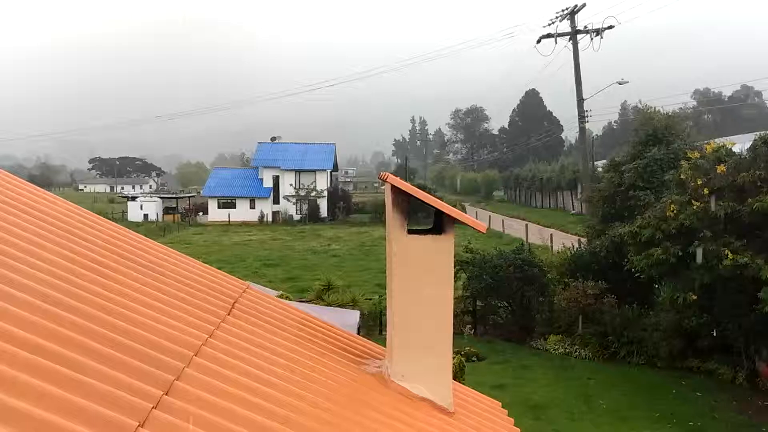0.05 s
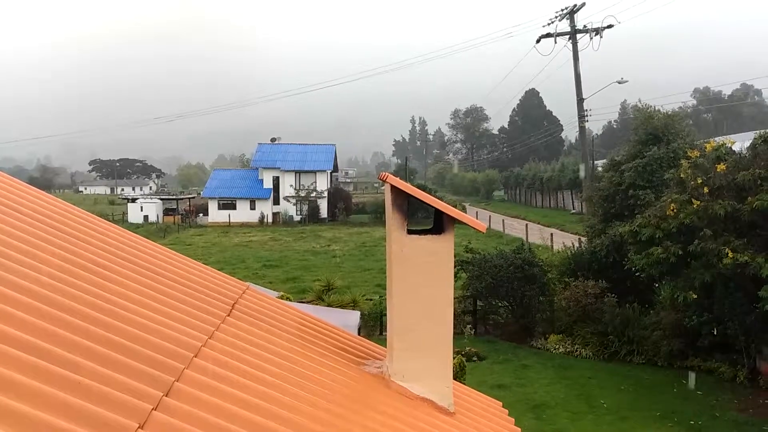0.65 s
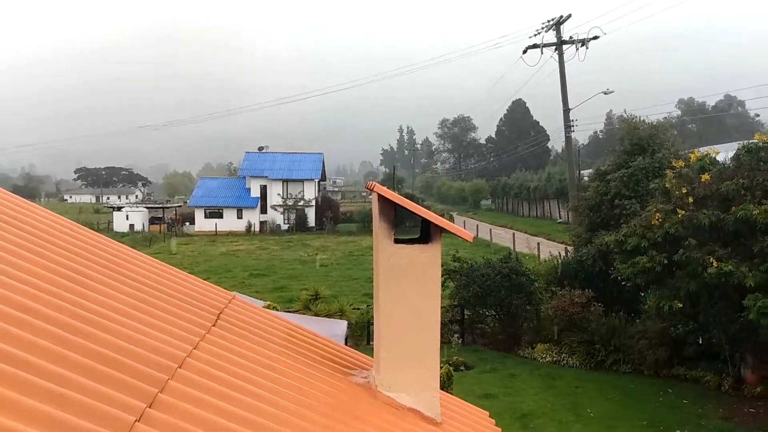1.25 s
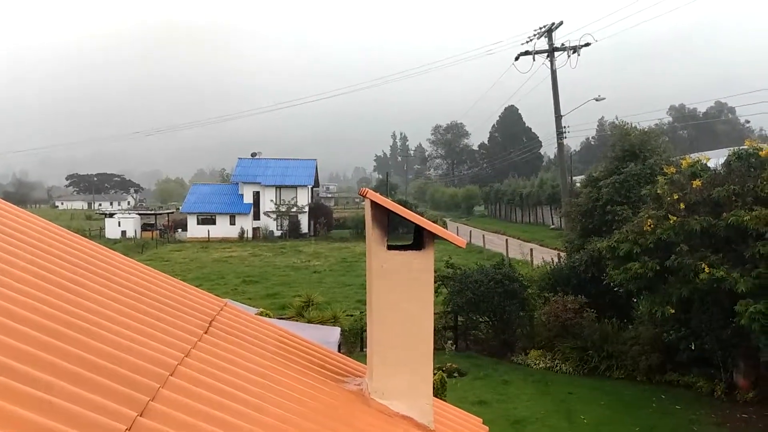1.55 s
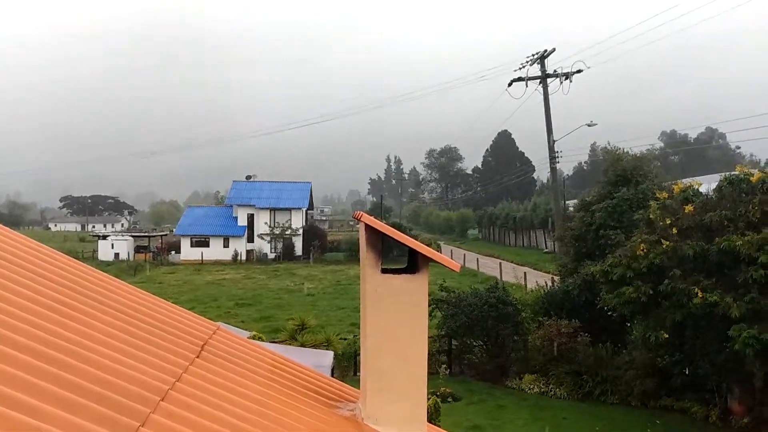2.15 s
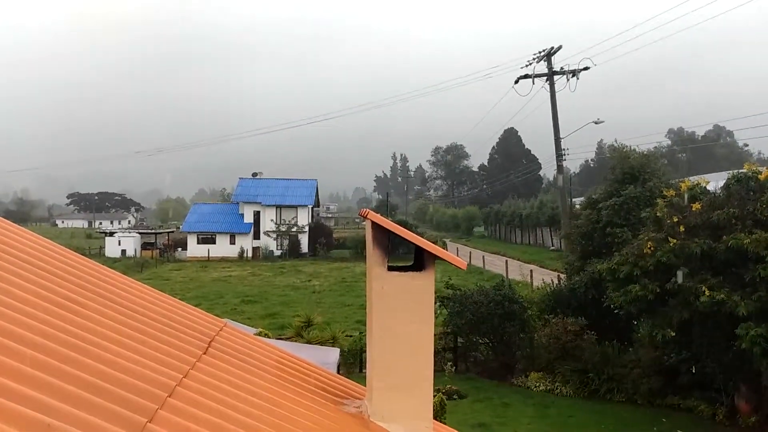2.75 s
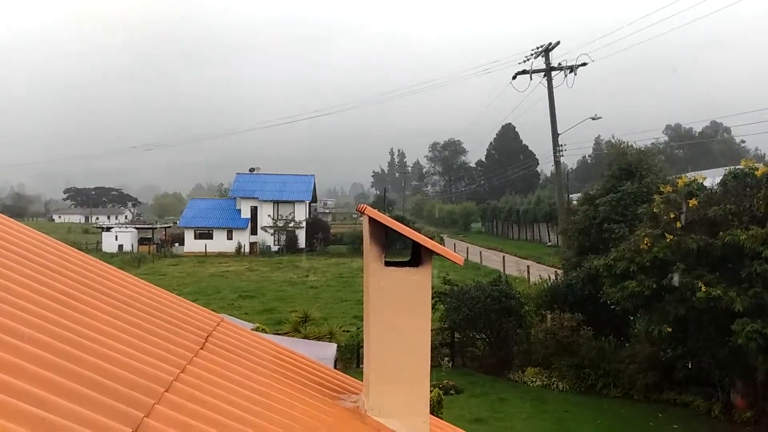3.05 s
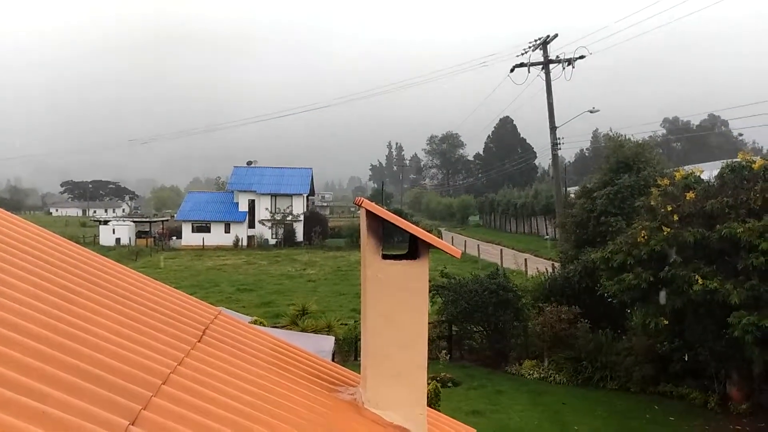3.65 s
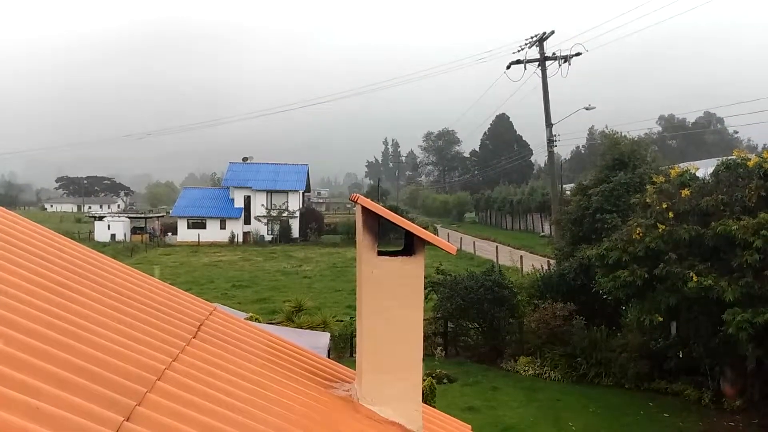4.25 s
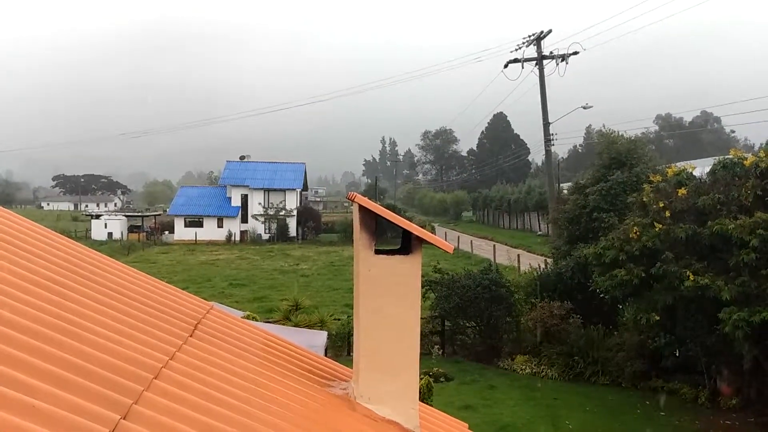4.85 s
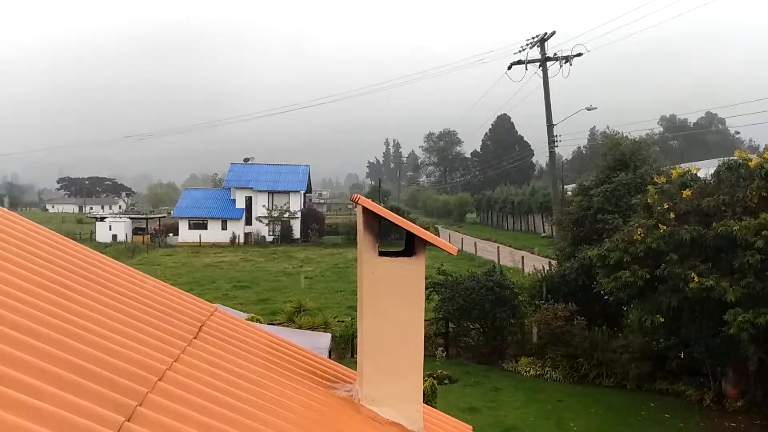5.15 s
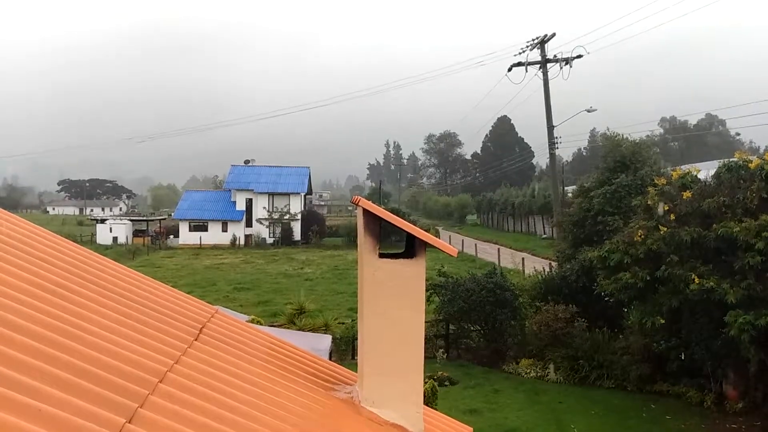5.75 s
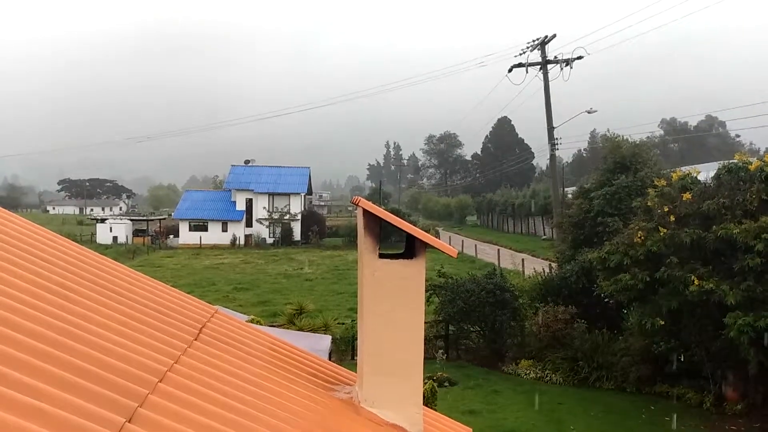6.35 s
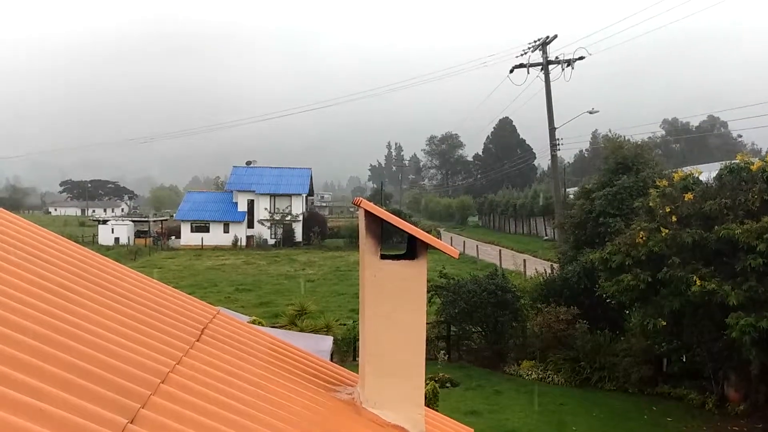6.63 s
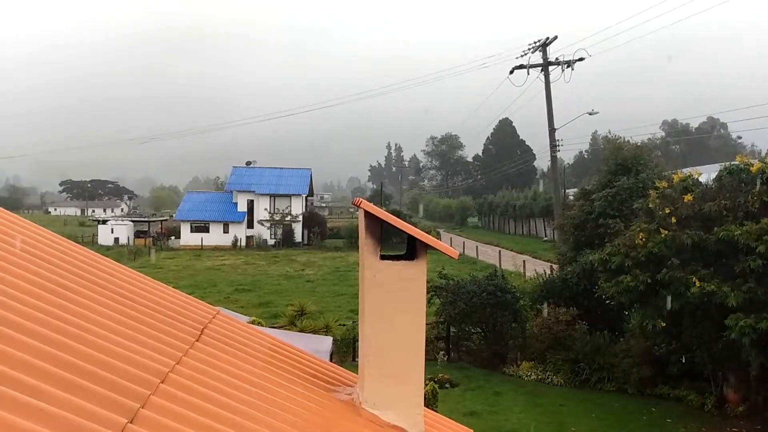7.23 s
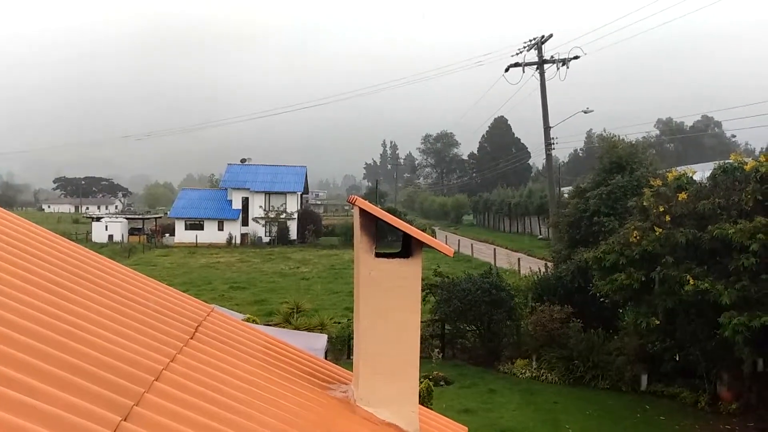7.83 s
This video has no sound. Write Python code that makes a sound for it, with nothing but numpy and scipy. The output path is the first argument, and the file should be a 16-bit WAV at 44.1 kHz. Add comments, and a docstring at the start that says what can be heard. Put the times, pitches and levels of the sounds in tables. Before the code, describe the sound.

Steady rain falls on a roof and the surrounding fields, an even wash with fine drops ticking close to the microphone and a few dull knocks on the roof. An engine drones very faintly far away. A little past halfway, thunder creeps in and the shower thickens. The thunder builds into two loud, booming rolls with deep thumps, the second the loudest, still sounding at the end.

```python
"""Steady rain on a roof and the fields around it, heard through a small pair of microphone ports.
Far drops merge into a wash; close by, fine ones fizz and tick, heavy ones knock on the roof and drips
splash below the eaves. An engine drones faintly in the distance. After four and a half seconds thunder
creeps in and the shower soon thickens. Shock waves from the branches of the lightning pile up into two
loud rolls, coloured by reflections between the roof and walls of the house."""
import sys
import numpy as np
from scipy import signal
from scipy.fft import rfft, irfft
from scipy.io import wavfile
from scipy.ndimage import uniform_filter1d, minimum_filter1d

SR = 44100
rng = np.random.default_rng(int(sys.argv[2]) if len(sys.argv) > 2 else 0)


def master_out(mix):
    """Clip the mix to full scale and print it as 16-bit PCM to the path in sys.argv[1]."""
    frames = np.transpose(np.atleast_2d(mix))
    ceiling = np.clip(frames, -1, 1)
    pcm = np.round(ceiling * 32767).astype(np.int16)
    wavfile.write(sys.argv[1], SR, pcm)


N = 347949
TIME, FREQ = np.arange(N) / SR, np.fft.rfftfreq(N, 1 / SR)

# Tone of the rain on roof and fields. Each row: frequency in Hz, relative level in dB.
RAIN_SPECTRUM = [(25, -27), (60, -14.5), (140, -12.5), (210, -2.5), (290, 1.5), (360, -2), (800, 0.4),
                 (1300, -2), (1900, -3.5), (2800, -13.5), (4300, -26.5), (6200, -34.5), (7800, -42),
                 (15000, -43.5)]
# How alike the rain is at the two ports. Each row: frequency in Hz, coherence from 0 to 1.
RAIN_COHERENCE = [(50, 0.5), (140, 0.3), (200, 0.73), (290, 0.9), (390, 0.51), (650, 0.85), (1100, 0.97),
                  (1320, 0.94), (1500, 0), (1800, 0.7), (2250, 0.96), (2600, 0.44), (2900, 0.14),
                  (3400, 0.5), (4600, 0.73), (5300, .5), (9000, 0.5)]
# Where the rain sits between the ports. Each row: frequency in Hz, left over right in dB.
RAIN_BALANCE = [(100, 5), (180, -2), (340, 3), (400, 1.5), (1150, 0), (1550, 5), (2100, -0.7), (2900, -1.5),
                (3700, 3.5), (6800, 5.5), (8500, 11), (12500, 9), (15500, 13.5)]
# How far the left port leads the right. Each row: frequency in Hz, phase in radians.
LEFT_PORT_LEAD = [(0, 0), (120, -.4), (175, .6), (310, -.4), (420, .15), (560, -.15), (1350, 0),
                  (1600, -2.5), (2200, -3.14), (2600, -3.9), (3150, -6.3), (3550, -6.2), (4500, -3.2),
                  (15200, 24.5)]
# Tone of fine drops close to the microphone. Each row: frequency in Hz, relative level in dB.
SPRAY_SPECTRUM = [(500, -18.5), (2500, 1), (5500, 6.5), (8000, -1.5), (13000, 5), (15500, 3.5)]
# The nearest drops. Each row: start in seconds, relative peak in dB, left over right in dB.
NEAR_DROPS = [(2.4475, -59, 9), (3.5912, -53, 8.5), (4.1513, -56, 9), (4.1753, -55, 9), (4.5733, -58, 9),
              (5.404, -50, 4), (5.4841, -50, 13), (5.6493, -56, 14), (6.769, -55, 10), (7.1163, -56, 16),
              (7.6243, -48, 12.5)]
# Heavy drops on the roof. Each row: start in seconds, level in dB.
ROOF_KNOCKS = [(0.229, -35), (0.343, -32), (0.793, -37), (0.851, -30), (2.455, -34), (3.92, -35),
               (5.385, -30)]
# Pulls of the far engine. Each row: start and length in seconds, first and last firing rate in Hz,
# relative level in dB.
ENGINE_PULLS = [(0.363, 0.6, 47.2, 54.7, -67), (0.92, 0.39, 59, 63.6, -61), (1.57, 0.53, 47.5, 62.7, -63),
                (2.22, 0.4, 59.4, 56, -64), (2.76, .34, 49, 47, -60), (3.45, 1, 48, 44.7, -76)]
# Drips below the eaves. Each row: start in seconds, relative level in dB.
EAVES_DRIPS = [(0.535, -63), (4.9, -57), (4.95, -64), (6.12, -58), (6.65, -60), (7.091, -56), (7.749, -57)]
# Tone of thunder dulled by the air. Each row: frequency in Hz, relative level in dB.
THUNDER_SPECTRUM = [(20, -23), (46, 0), (80, 2.5), (140, 0.5), (280, -1), (420, -7), (600, -7), (1000, -17),
                    (1500, -23.5), (2000, -29), (2600, -53), (4000, -60.5), (7000, -79)]
# Peaks and dips from reflections between roof and walls. Each row: centre and width in Hz,
# gain in dB before scaling by the wall depth.
WALL_RESONANCES = [(66, 13, -6.5), (117.4, 5.2, 11), (148.3, 23, 7.5), (177, 11, -5.5), (200.4, 10, 9),
                   (223, 15, 2.5), (230.4, 17, -1), (279, 15, 5.5), (443, 12, -2), (518, 33, 1),
                   (607, 11, -7)]
# How alike the thunder is at the two ports. Each row: frequency in Hz, coherence from 0 to 1.
THUNDER_COHERENCE = [(50, 0.78), (125, 0.59), (165, 0.27), (210, 0.67), (310, 0.93), (410, 0.56),
                     (550, 0.89), (1100, 0.97), (1320, 0.9), (1500, 0.061), (1800, 0.81), (2200, 1),
                     (2900, 0.26)]
# Where the thunder sits between the ports. Each row: frequency in Hz, left over right in dB.
THUNDER_BALANCE = [(50, 7.5), (120, 1.5), (200, 3.5), (350, 2.5), (450, 2), (1100, 0), (1600, 0.5),
                   (2500, 0), (5000, 3)]
# One peal for each branch of the lightning. Each row: start and swell in seconds, boom level in dB,
# then roar, rumble and echo in dB relative to it, all before the band trims.
THUNDER_PEALS = [(4.581, 0.19, -51, 4.5, -7.5, -5.5), (5.155, 0.2, -47.5, 2, -13, -7),
                 (5.351, 0.049, -47.5, 11, -18, -12), (5.542, 0.12, -50, 7, -1, -7),
                 (5.778, 0.081, -42.5, 6, -12, -2.5), (5.923, 0.12, -40, 6, -9, -2),
                 (5.992, 0.37, -24, 3.5, -15, 1), (6.12, 0.11, -37, -1, -1.5, -14.5),
                 (6.442, 0.11, -29, 8.5, -20, -2.5), (6.727, 0.067, -31.5, 13, -16.5, -2.5),
                 (6.86, .11, -35, 11.5, -14, -10), (7.015, 0.029, -36, 13.5, -6, -17),
                 (7.19, 0.23, -20.5, 1, -16, -7.5), (7.426, 0.082, -17.5, 1, -18.5, -9.5),
                 (7.539, 0.056, -16.5, 3, -14, -1.5), (7.599, 0.099, -12, -6, -23, -1.5),
                 (7.73, .11, -15.5, -6.5, -12, 4)]
# The strongest shocks in the rolls. Each row: time in seconds, peak at the left in dB, width in seconds.
SHOCK_FRONTS = [(6.379, -3, 0.0012), (6.562, -3, .001), (6.809, -4, 0.00092), (6.94, -9, 0.00077),
                (7.051, -8.5, 0.00046), (7.438, -3.5, 0.0011), (7.5008, 3, 0.00097), (7.587, -4, 0.00091)]


def amp(db):
    """Decibels to gain."""
    return 10 ** (np.asarray(db) / 20)


def unit(x):
    """Scales a sound so that the mean of its channels has rms 1."""
    return x / np.sqrt(np.mean(np.atleast_2d(x).mean(0) ** 2) + 1e-24)


def spectrum(points):
    """Joins (Hz, value) rows into a curve on a log-frequency axis."""
    hz, value = np.transpose(points)
    return np.interp(np.log(FREQ + 1), np.log(hz + 1), value)


def colour(x, gain):
    """Filters by a gain for each frequency."""
    return irfft(rfft(x) * gain, N)


def below(hz, order=8):
    """Gain of a smooth low-pass."""
    return 1 / (1 + (FREQ / hz) ** order)


def around(hz, width_hz, order=2):
    """Gain of a smooth band-pass."""
    return 1 / (1 + (2 * (FREQ - hz) / width_hz) ** order)


def wander(hz):
    """Random drift of rms 1, up to about the given rate."""
    return unit(colour(rng.standard_normal(N), below(hz, order=4)))


def impacts(per_s, spread_db):
    """Two unrelated trains of clicks, most of them small and a few large."""
    size = amp(spread_db * np.minimum(rng.exponential(1, (2, N)), 4))
    return size * rng.choice([-1., 1.], (2, N)) * (rng.random((2, N)) < per_s / SR)


def bursts(events, rise_s, fall_s):
    """Envelope that rises and dies away at each (seconds, dB) event."""
    ages = [(np.maximum(TIME - start, 0), db) for start, db in events]
    return sum(amp(db) * (1 - np.exp(-age / rise_s)) * np.exp(-age / fall_s) for age, db in ages)


def ports(pair, coherence, side_db):
    """Turns two unrelated sounds into what the left and right microphone ports hear."""
    left, unrelated = rfft(pair)
    coherence, ratio = np.clip(coherence, 0, 1), amp(side_db)
    lead = np.interp(FREQ, *np.transpose(LEFT_PORT_LEAD))
    right = (coherence * left + np.sqrt(1 - coherence ** 2) * unrelated) * np.exp(-1j * lead)
    return irfft(np.array([ratio * left, right]) / np.sqrt(1 + ratio ** 2), N)


def shower_db(from_s=5.34, to_s=6.12, rise_db=8, ease_db_per_s=0.5):
    """How hard it rains: steady, then thickening, then slowly easing."""
    return np.interp(TIME, [from_s, to_s], [0, rise_db]) - ease_db_per_s * np.maximum(TIME - to_s, 0)


def rain(level_db=-40, patter_db=-4, swell_db=0.45, flutter_db=0.31, shower_share=0.4):
    """Countless drops out on the fields merge into a wash; nearer ones patter on the roof."""
    wash = unit(rng.standard_normal((2, N)))
    patter = amp(patter_db) * unit(impacts(per_s=1800, spread_db=3))
    drops = (wash + patter) * amp(swell_db * wander(hz=18) + flutter_db * wander(hz=30))
    drops = colour(drops, amp(spectrum(RAIN_SPECTRUM)))
    heard = ports(drops, spectrum(RAIN_COHERENCE), spectrum(RAIN_BALANCE))
    return amp(level_db + shower_share * shower_db()) * unit(heard)


def spray(level_db=-81, clump_db=6):
    """Fine drops fizz in clumps close by, nearer to the left port."""
    drops = impacts(per_s=4000, spread_db=4.5) * amp(clump_db * wander(hz=16))
    fizz = colour(drops, amp(spectrum(SPRAY_SPECTRUM)))
    return amp(level_db + shower_db()) * unit(ports(fizz, coherence=0.45, side_db=9))


def drop_ticks(splash_s=0.00033, trim_db=6.5, faint_per_s=3, faint_db=-68, spread_db=3, faint_side_db=9):
    """Each drop beside the microphone is a tiny, dry splash, all treble; fainter ones fall at random."""
    out, t = np.zeros((2, N)), np.arange(400) / SR
    waits, sizes = rng.exponential(1, (60, 2)).T
    faint = [(start, faint_db + spread_db * min(size, 2), faint_side_db)
             for start, size in zip(np.cumsum(waits) / faint_per_s, sizes)]
    for start, db, side_db in list(NEAR_DROPS) + faint:
        splash = rng.standard_normal((2, len(t))) * t * np.exp(-t / splash_s)
        splash /= abs(splash).max(1, keepdims=True)
        splash *= amp([[side_db / 2], [-side_db / 2]])
        slot = out[:, round(start * SR):][:, :len(t)]
        slot += amp(db + trim_db) * splash[:, :slot.shape[1]]
    return colour(out, 1 - below(hz=1500, order=1))


def roof_knocks():
    """A heavy drop gives a dull, quickly damped knock on the roof."""
    ring = unit(colour(rng.standard_normal(N), around(hz=950, width_hz=600, order=4)))
    return ring * bursts(ROOF_KNOCKS, rise_s=0.00092, fall_s=0.0065)


def far_engine(rough_db=2, trim_db=-2, side_db=2, ramp_s=0.16):
    """Only the firing tone of the engine carries this far; it swells and glides with each pull."""
    out = np.zeros(N)
    for start, length, first_hz, last_hz, db in ENGINE_PULLS:
        t = TIME - start
        firing_hz = np.interp(t, [0, length], [first_hz, last_hz])
        load = np.clip(np.minimum(t, length - t) / ramp_s, 0, 1)
        out += amp(db + trim_db) * load * unit(np.sin(2 * np.pi * np.cumsum(firing_hz) / SR))
    return out * amp(rough_db * wander(hz=8.4)) * amp([[side_db / 2], [-side_db / 2]])


def eaves_drips(trim_db=-4):
    """A drip lands below the eaves, a little to the left, and bursts into a short, soft hiss."""
    hiss = colour(rng.standard_normal((2, N)), around(hz=5600, width_hz=1800))
    heard = unit(ports(hiss, coherence=0.33, side_db=5))
    return amp(trim_db) * heard * bursts(EAVES_DRIPS, rise_s=0.0048, fall_s=0.018)


def shock_crowd(lump_db=-0.02, wall_depths=(0.68, 1.11), harder_at_s=6.4, blend_s=0.24):
    """Shock waves from all along the lightning channel reach the house in a crowd, dulled by the air."""
    walls_db = sum(db * around(hz, width_hz) for hz, width_hz, db in WALL_RESONANCES)
    shocks = impacts(per_s=5000, spread_db=0.7) * amp(lump_db * wander(hz=21))
    # Partway through the first roll, the walls start to ring harder.
    mild, hard = (colour(shocks, amp(spectrum(THUNDER_SPECTRUM) + depth * walls_db))
                  for depth in wall_depths)
    blend = np.clip((TIME - harder_at_s) / blend_s, 0, 1)
    crowd = (1 - blend) * mild + blend * hard
    return ports(crowd, spectrum(THUNDER_COHERENCE), spectrum(THUNDER_BALANCE))


def peal(start, swell_s, echo_db, fall_db=5, echo_db_per_s=12.5):
    """Envelope of one peal: swell, fall (the quicker the swell, the quicker the fall), echo."""
    t = TIME - start
    swell = np.sin(np.pi / 2 * np.clip(t / swell_s, 0, 1)) ** 2
    past_peak = np.maximum(t - swell_s, 0)
    return swell * amp(np.maximum(-fall_db * past_peak / swell_s, echo_db - echo_db_per_s * past_peak))


def thunder(trims_db=(-1.3, -2, -1.87, -18.5), dull_db_per_s=3, dull_pivot_s=5.8):
    """Peals pile up into rolls, each with its own mix of rumble, boom, roar and crackle."""
    crowd = shock_crowd()
    low, body, dull = below(hz=68), below(hz=300, order=3), below(hz=1223, order=6)
    upper = (1 - low) * (1 - body)
    bands = [low, (1 - low) * body, upper * dull, upper * (1 - dull)]  # rumble, boom, roar, crackle
    powers = 0
    for start, swell_s, boom_db, roar_db, rumble_db, echo_db in THUNDER_PEALS:
        # Later peals have come farther, so they keep less crackle.
        crackle_db = roar_db - dull_db_per_s * (start - dull_pivot_s)
        levels_db = boom_db + np.array([rumble_db, 0, roar_db, crackle_db]) + trims_db
        powers += np.outer(amp(levels_db), peal(start, swell_s, echo_db)) ** 2
    return sum(np.sqrt(power) * unit(colour(crowd, band)) for power, band in zip(powers, bands))


def close_click(at_s=4.7, peak_db=-29, fall_s=0.00036):
    """One close, dry click with a full body, alike in both ports."""
    t = TIME - at_s
    return -amp(peak_db) * (t >= 0) * np.exp(-np.maximum(t, 0) / fall_s)


def thunder_thumps(side_db=3.5):
    """The strongest shock fronts stand out as rounded thumps, louder at the left port."""
    out = np.zeros(N)
    for at_s, db, width_s in SHOCK_FRONTS:
        offset_squared = ((TIME - at_s) / width_s) ** 2
        out -= amp(db) * (1 - offset_squared) * np.exp(-np.minimum(offset_squared, 100) / 2)
    return out * amp([[0], [-side_db]])


def scene():
    """What reaches the microphone: rain all round, drops close by, engine and thunder from afar."""
    around_house = rain() + spray() + drop_ticks() + roof_knocks() + eaves_drips() + close_click()
    return around_house + far_engine() + thunder() + thunder_thumps()


def record(dry, low_cut_hz=36, ceiling_db=-0.6, hold_db=-11.5, recover_db_per_s=1, edge_hz=15550):
    """The recorder: low cut, fade-in, a gain control that ducks under the loudest roll, band limit."""
    heard = colour(dry, 1 - below(low_cut_hz, order=6))
    peak_db = 20 * np.log10(abs(heard).max(0) + 1e-9)
    power_db = 10 * np.log10(abs(uniform_filter1d((heard ** 2).mean(0), size=2600)) + 1e-12)
    excess_db = np.maximum(peak_db - ceiling_db, power_db - hold_db)
    # The gain drops at once on too much peak or power, then creeps back.
    recovery_db = TIME * recover_db_per_s
    over_db = np.maximum(np.maximum.accumulate(excess_db + recovery_db) - recovery_db, 0)
    duck_db = uniform_filter1d(minimum_filter1d(-over_db, size=200), size=200)
    on_s, open_s = 0.124, 0.33
    switch_on = np.clip((TIME - on_s) / 0.002, 0, 1)
    fade_in = switch_on * amp(np.interp(TIME, [on_s, open_s], [-14, 0]))
    band_limit = signal.firwin(1023, edge_hz, window=("kaiser", 9), fs=SR)
    return signal.oaconvolve(heard * fade_in * amp(duck_db), band_limit[None], "same")


dry = scene()
out = record(dry)
master_out(out)
```